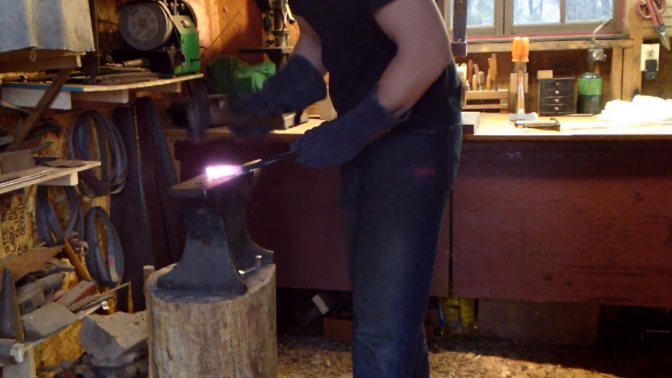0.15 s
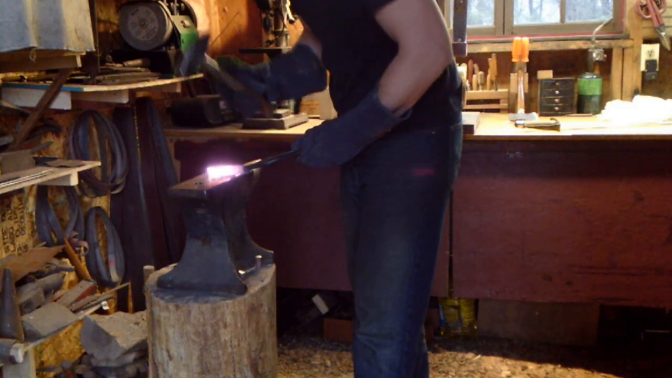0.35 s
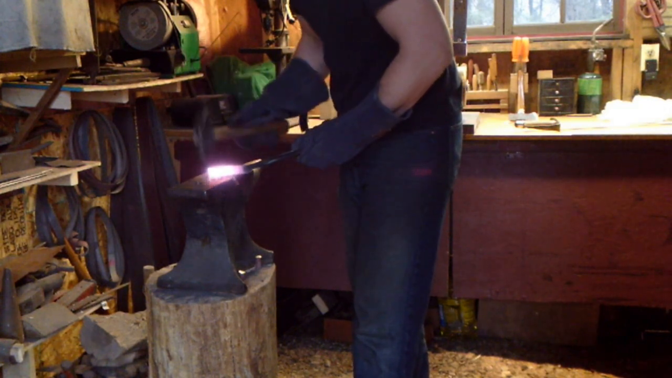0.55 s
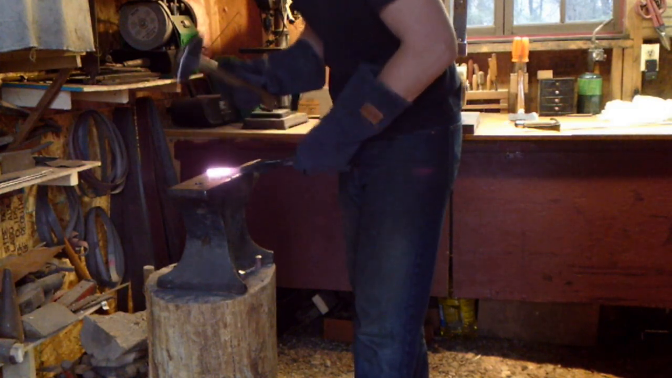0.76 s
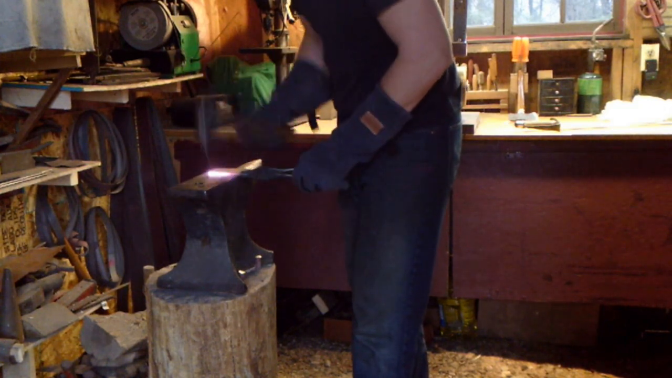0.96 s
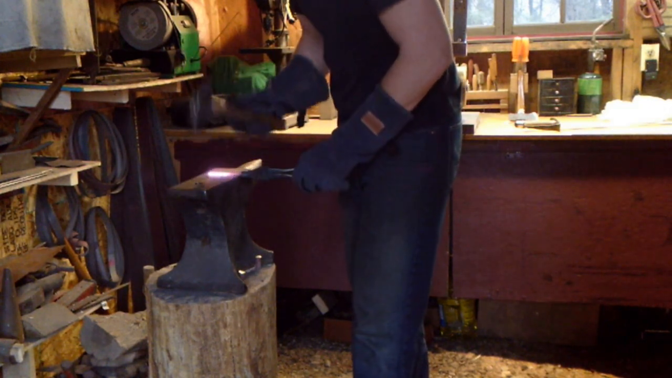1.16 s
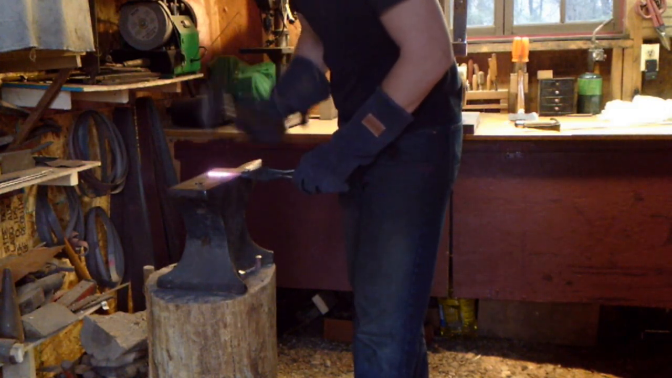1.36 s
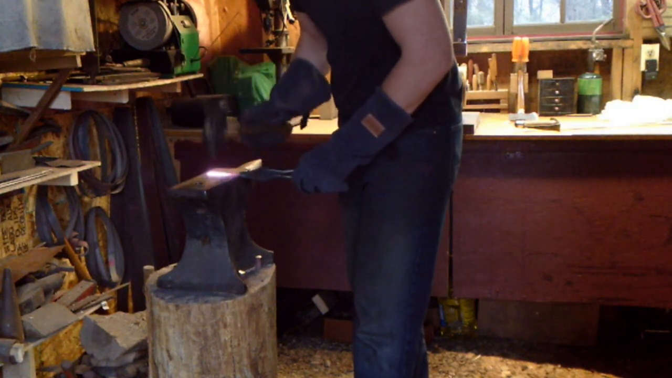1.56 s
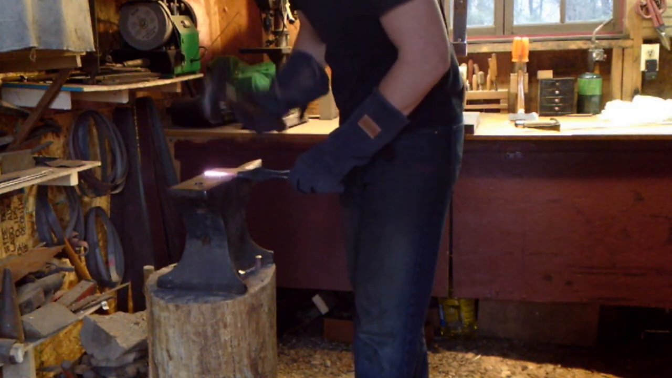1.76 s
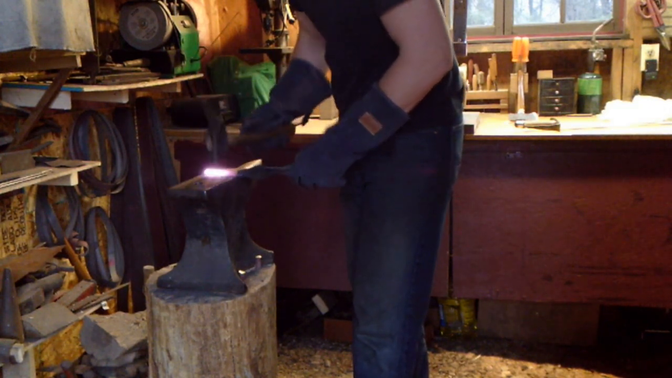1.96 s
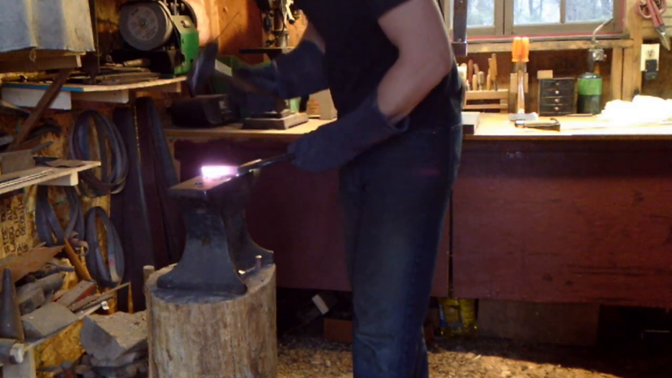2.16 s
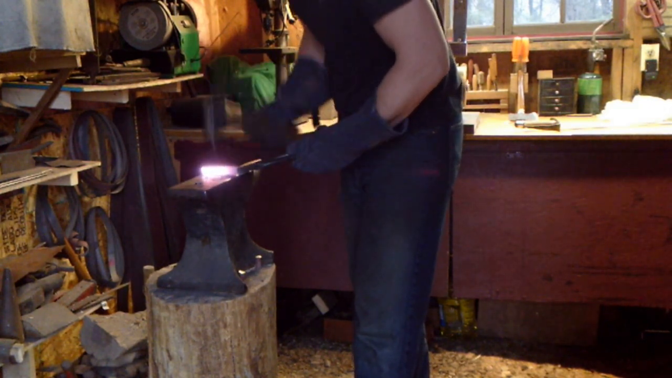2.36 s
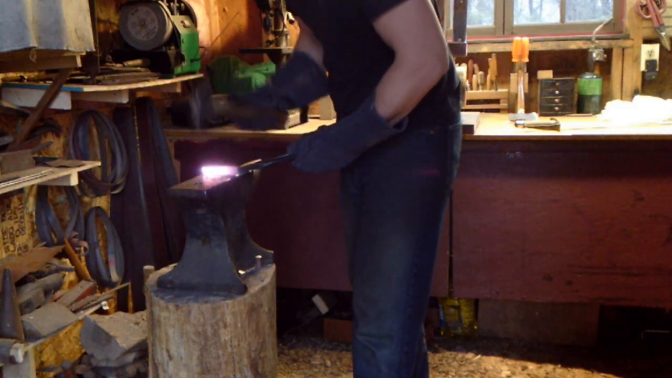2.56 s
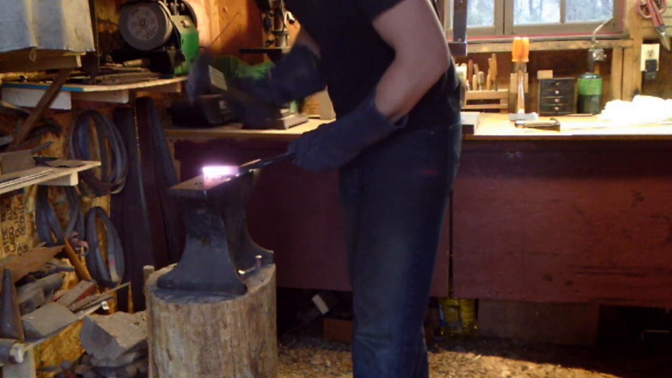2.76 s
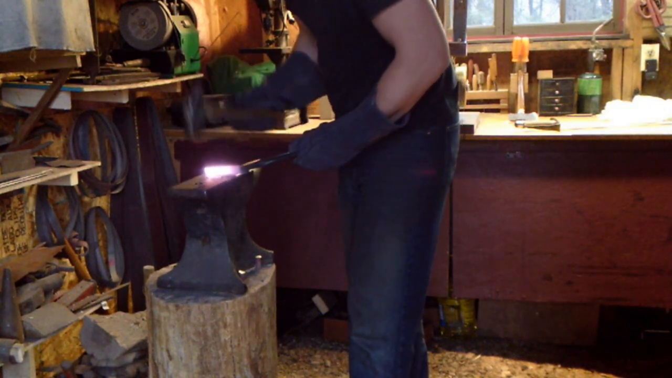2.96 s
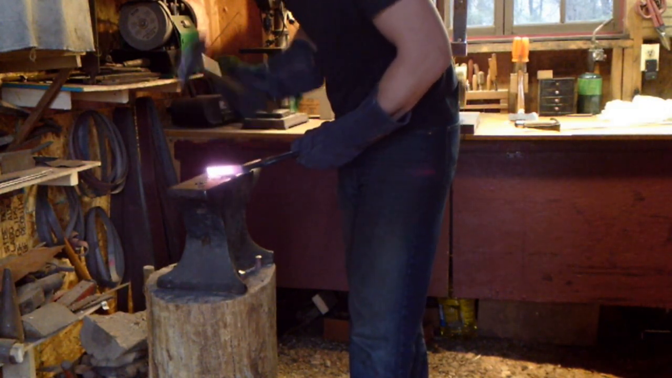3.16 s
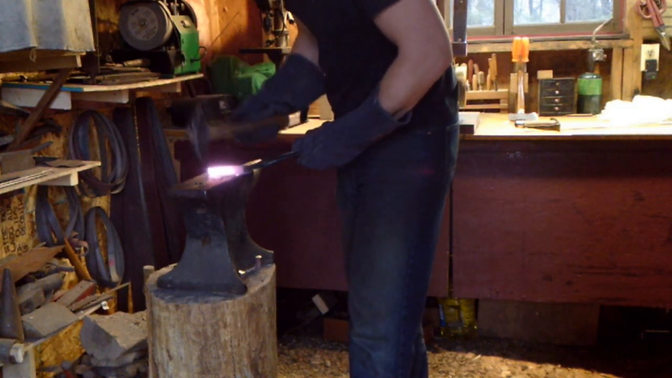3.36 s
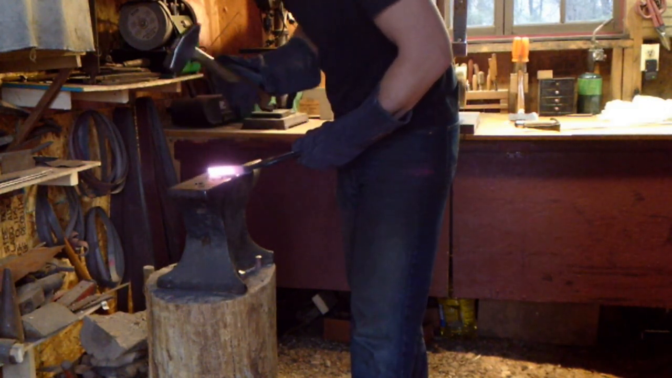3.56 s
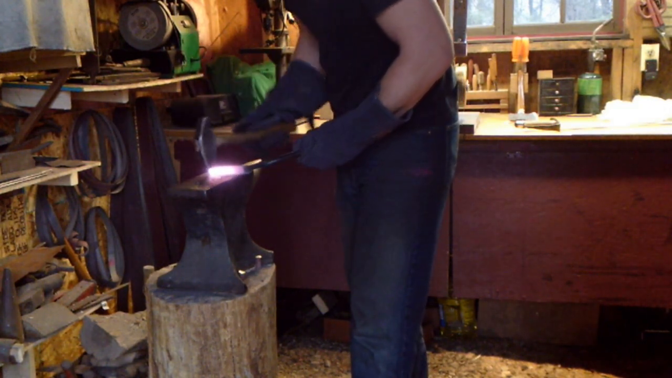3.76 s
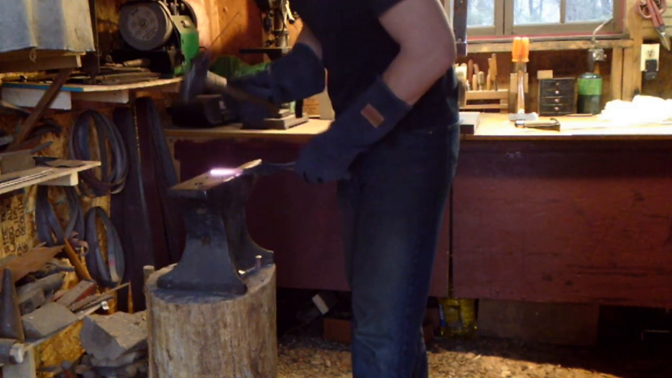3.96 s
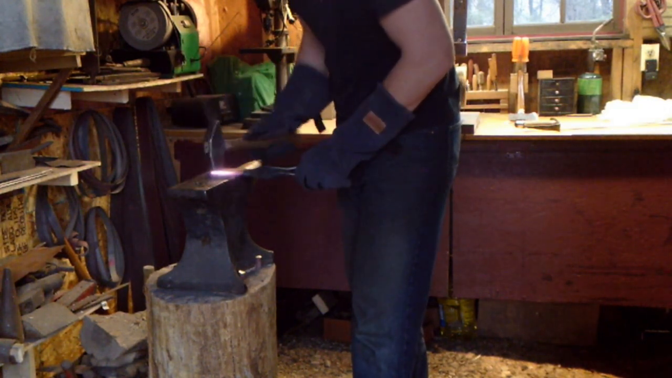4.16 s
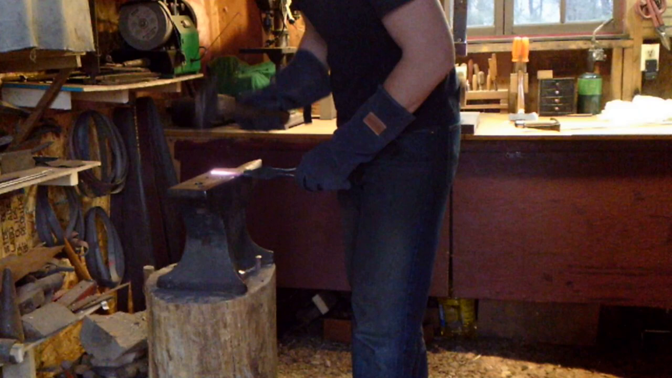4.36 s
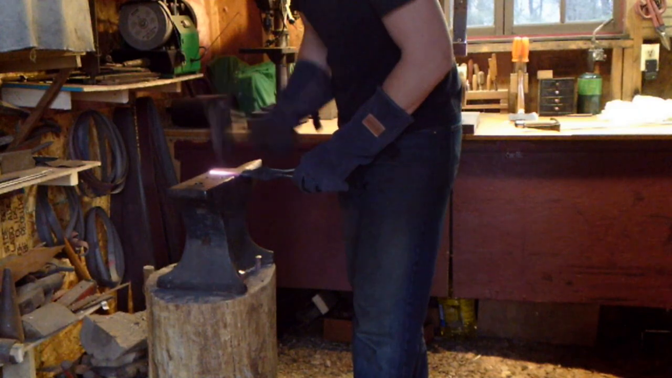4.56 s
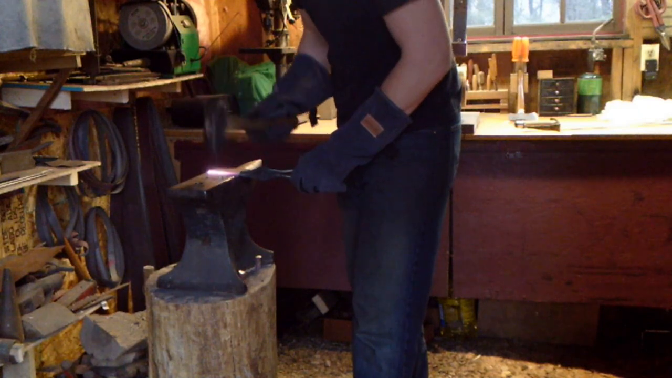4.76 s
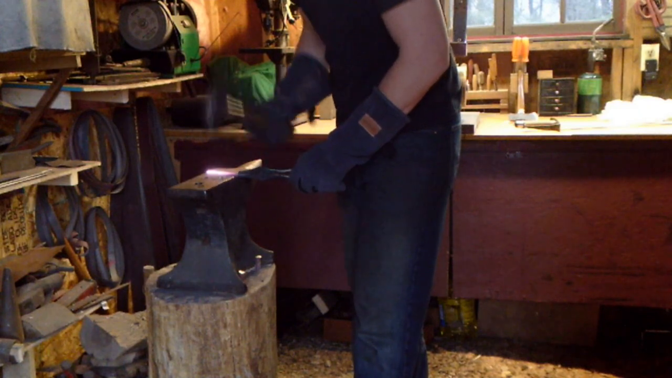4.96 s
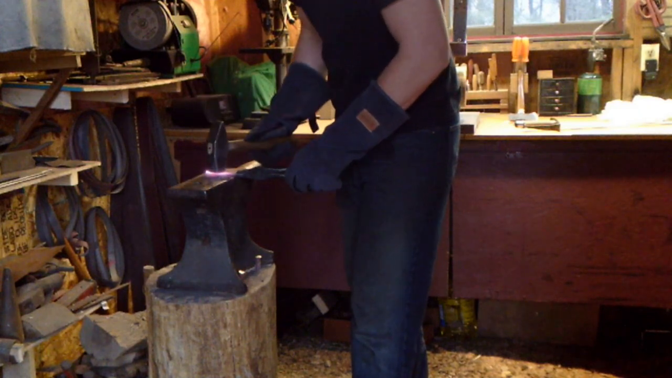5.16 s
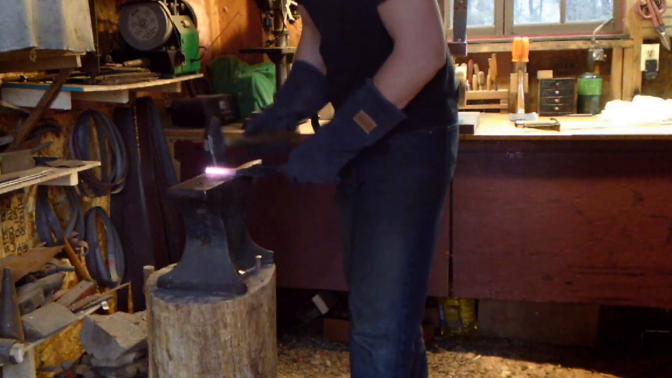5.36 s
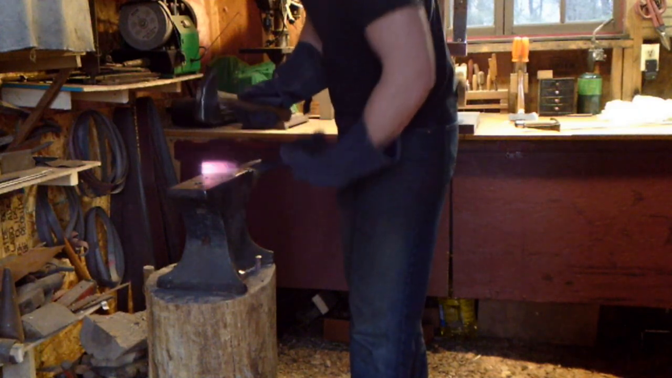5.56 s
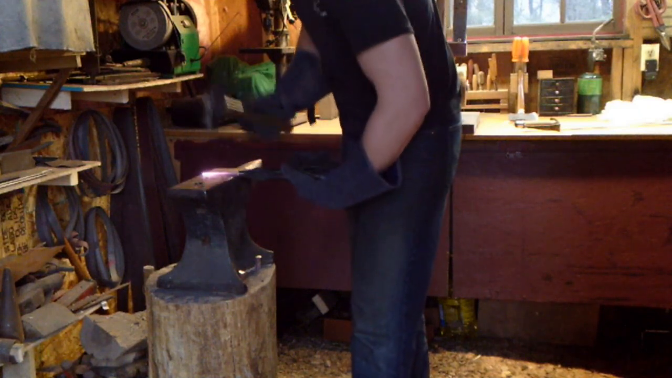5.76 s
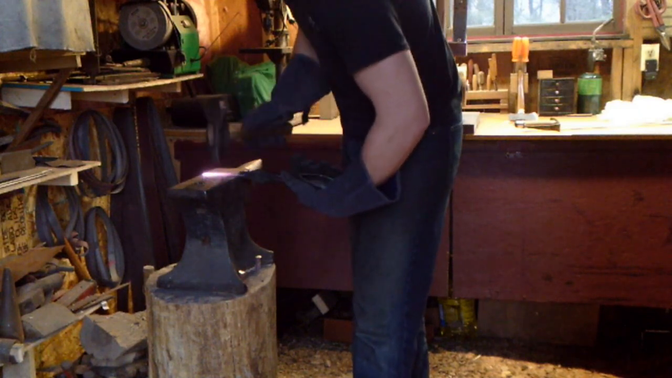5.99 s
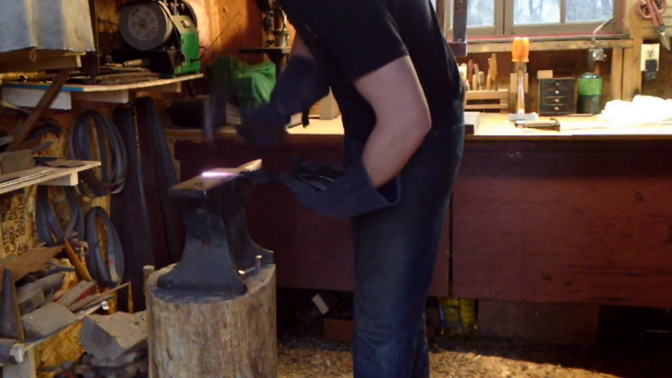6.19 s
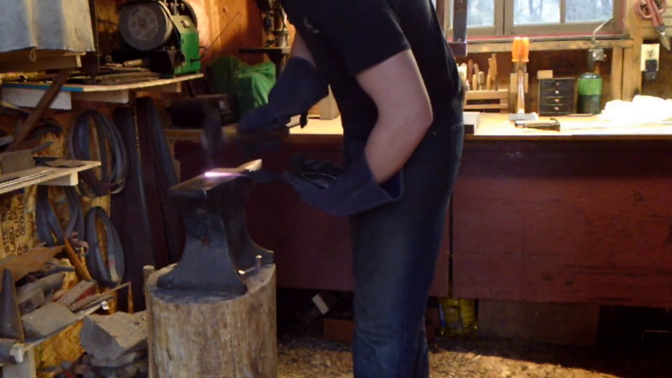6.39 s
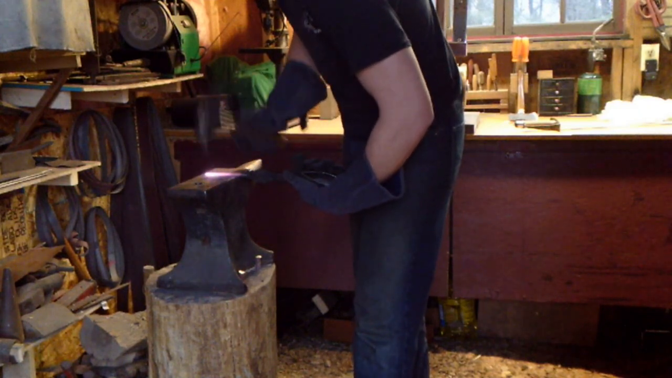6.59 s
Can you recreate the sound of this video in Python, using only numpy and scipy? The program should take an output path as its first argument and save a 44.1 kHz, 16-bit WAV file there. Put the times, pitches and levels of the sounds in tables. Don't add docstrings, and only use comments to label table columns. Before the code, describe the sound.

Close hammering on an anvil in a small workshop, over very faint rumble and hiss. Blows come about every 0.45 seconds: fairly soft, thuddy clanks at 0.05, 0.5 and 1.0, then sharper at 1.45, a hard crack at 1.87, and strong ones at 2.42 and 2.87. Softer blows follow at 3.3, 3.8 and 4.2, then very hard, clipped strikes at 4.64 and 5.07. Each has a dull floor and stump thump, a bright crack and a short anvil ring of a few tenths of a second, smeared by quick room reflections. Between blows the bar ticks and the tongs rattle lightly. Around 5.25 the bar scrapes and rocks, and a louder clatter comes at 5.64 as it is turned, with another rattle at 5.89. Two more hard blows land at 5.9 and 6.3, and the ring fades. The narrow-band microphone distorts on the hardest hits.

```python
import sys
import numpy as np
from scipy import signal
from scipy.io import wavfile

SR = 44100
rng = np.random.default_rng(int(sys.argv[2]) if len(sys.argv) > 2 else 0)


def unload_audio(sound):
    columns = np.transpose(np.atleast_2d(sound))
    steps = np.round(np.clip(columns, -1, 1) * 32767)
    wavfile.write(sys.argv[1], SR, steps.astype(np.int16))


def makeup_ratio(level_db):
    decades = np.asarray(level_db, float) / 20
    return 10 ** decades


N = 292368

# frequency in Hz, level in dB per Hz.
AIR_SPECTRUM = [(12, -10), (25, 2), (76, -12), (145, -18.5), (316, -21), (600, -22.5), (1030, -24.5),
                (1890, -27.5), (2500, -27), (4000, -30), (6500, -28.5)]
# frequency in Hz, t60 in seconds.
ROOM_T60 = [(40, .4), (160, 0.3), (420, 0.21), (1100, 0.16), (2900, 0.155), (6000, .165)]
EDGES_HZ = 22 * 2 ** np.arange(0, 8.6, .5)

# start in seconds, level in dB, pitch in Hz.
TAPS = [(.186, -38.5, 2380), (.204, -37.5, 5360), (0.412, -49, 600), (.807, -43, 610), (0.884, -42.5, 1780),
        (1.283, -39, 970), (1.686, -42.5, 2490), (1.753, -40, 1880), (1.787, -41, 1040), (1.81, -29, 2480),
        (2.007, -32, 943), (2.207, -43, 2330), (2.264, -47, 4840), (2.725, -45, 3290), (3.019, -36, 2160),
        (3.281, -40, 1050), (3.903, -39.5, 2560), (3.954, -41, 2260), (4.002, -42, 1660),
        (4.028, -43.5, 1090), (4.336, -39.5, 2170), (4.524, -45, 2170), (4.557, -42, 1550),
        (4.876, -45, 760), (5.368, -36.5, 2270), (5.41, -42.5, 590), (5.59, -40.5, 2360),
        (5.618, -44, 1600), (5.81, -37.5, 1330), (2.685, -48, 1000)]
# start in seconds, level in dB, pitch in Hz.
RATTLES = [(.002, -48, 4240), (0.302, -49, 1824), (.372, -42.5, 2280), (.785, -44.5, 980),
           (.933, -50, 3080), (0.976, -38, 2010), (1.323, -34, 4210), (2.803, -43.5, 1120),
           (3.092, -43, 920), (3.142, -36.5, 1170), (3.65, -31, 2320), (3.673, -39, 3040),
           (4.443, -47, 1160), (4.492, -42.5, 726), (4.83, -36.5, 820), (4.952, -39, 2160),
           (5.282, -36, 1770), (5.306, -42, 2200), (5.635, -21.5, 760), (5.703, -37.5, 1340),
           (5.71, -37, 4370), (5.783, -43, 4320), (5.891, -28.5, 2560), (6.271, -43, 1134),
           (6.573, -43, 1460)]
# start in seconds, level in dB, pitch in Hz, width in octaves.
SLIDES = [
    (.287, -45, 1060, 0.6),
    (1.255, -42, 1160, 3),
    (2.295, -49.5, 1130, 1.3),
    (5.25, -36.5, 2180, 1.3),
    (5.256, -39.5, 616, 0.7),
    (5.524, -49, 1050, 1.4),
    (5.637, -34.5, 685, 0.5),
    (5.654, -52, 1840, .4),
    (5.66, -40, 1780, 3.7),
]
SETTLES_S = [.186, 3.019, 3.904, 5.25]

# start in seconds, crack level in dB, thud level in dB, first burst in dB over the tail,
# brightness in dB per octave.
BLOWS = [(0.051, -13.5, -12, 11, 2), (0.5045, -14, -12, 6.5, 0.5), (1.0211, -15.5, -13.5, -1.5, 4.5),
         (1.445, -6, -11.5, 12.5, 3.5), (1.8667, 1, -11, 6, 2), (2.4208, -3, -14, 0.5, 0.1),
         (2.866, -4, -12, 6, 1.2), (3.3176, -12, -12.5, 4.5, 4), (3.7705, -8, -11, -1, 0.5),
         (4.219, -11, -13, -1, 8.5), (4.6444, 4.5, -9.5, 12, 3), (5.0738, 5, -12, 13, 2.5),
         (5.8953, 0.8, -16, -2.5, 1.5), (6.296, 1.5, -12, 15.5, 2.5)]
# steps along (-1.5..1.5), steps across (-1.5..1.5),
# gain of the main ring in dB as the bar muffles or frees it.
SPOTS = [(1.3, 1.3, -3.5), (0.27, 1.4, -2.3), (-0.58, -0.42, 2.5), (0.03, 0.046, 1.5), (-0.77, 0.55, 0.1),
         (0.39, -0.33, 0.8), (0.44, -0.12, -1.5), (-0.15, -0.085, 4), (0.32, -1.2, 2.6),
         (-0.84, -0.58, 1.5), (-1.4, -0.23, -1.5), (0.91, -1.1, -2.5), (-0.8, 0.51, -4.5), (-0.2, 0.4, 2)]
# frequency in Hz, level in dB per Hz.
THUD = [(40, -25), (150, -14.5), (300, -13), (500, -6.5), (850, -5.5), (1300, -14.5), (2200, -21.5),
        (6000, -35)]
CRACK = [(40, -54), (500, 6), (1200, 6), (1800, 9.5), (2600, 0), (3800, 4), (4700, -2.5), (5400, -7),
         (6500, 0.5)]
BOOM = [(25, -11.5), (65, -8), (140, -7.5), (240, -16.5), (500, -41.5), (6000, -61.5)]
# frequency in Hz, level in dB, t60 in seconds.
FLOOR = [(138, -4.5, 0.073), (68, -10.5, .12)]
# frequency in Hz, level in dB, t60 in seconds.
REBOUND = [(67, -17, .2), (100, -26, .12)]
# frequency in Hz, level in dB, t60 in seconds.
STUMP = [(366, -15, .33), (474, -7, .16), (657, -4, .12), (785, -6, .11), (841, -2, .13), (1083, -6, .12),
         (1203, -6, .12), (1292, -6, .12), (1490, -8, .1), (1543, -8, .1)]
# frequency in Hz, level in dB, t60 in seconds.
ANVIL = [
    [(1810, 0, .23), (1810, -23, .5), (1782, -11, .14), (1730, -3, .06)],
    [(2961, 0, .205), (3160, -18, .2)],
    [(3845, -3, .11), (3812, -3, .11), (3750, -9, .1)],
    [(4680, 0, .28)],
    [(4590, 0, .17), (4320, -9, .17), (5255, -5, .1)],
]
# level in dB over the crack, dB per step along,
# dB per step across, dB per burst dB.
VOICE_LAW = [(-7.5, -0.26, 0.75, 0.2054), (-12, 4, 0.75, 0.0654), (-8, -2.5, -0.1, 0.37),
             (-26.5, -0.6, 6.5, 0.16), (-32, 1.2, 0.6, 1.45)]

BUILD_UP_S = .0007


def at_hz(points, hz):
    points = np.array(points)
    return np.interp(np.log(hz), np.log(points[:, 0]), points[:, 1])


def convolve(x, response):
    return signal.fftconvolve(x, response)[:N]


def clicks(times, levels_db):
    out = np.full(N, 1e-18)
    out[np.round(np.asarray(times) * SR).astype(int)] = makeup_ratio(np.asarray(levels_db))
    return out


def ring(x, hz, t60):
    radius = makeup_ratio(-60 / (t60 * SR))
    angle = 2 * np.pi * hz / SR
    return signal.lfilter([0, np.sin(angle)], [1, -2 * radius * np.cos(angle), radius * radius], x)


def bands(size):
    white = rng.standard_normal((2, size + 8000))
    for k, (low, high) in enumerate(zip(EDGES_HZ, EDGES_HZ[1:])):
        sos = signal.butter(2, [low, high], "band", fs=SR, output="sos")
        yield np.sqrt(low * high), signal.sosfilt(sos, white[k % 2])[8000:]


def drift(rate_hz):
    r = np.exp(-80 * np.pi * rate_hz / SR)
    slow = signal.lfilter([1], [1, -2 * r, r * r], rng.standard_normal(N // 40 + 2002))[2000:]
    return np.interp(np.arange(N) / 40, np.arange(len(slow)), slow / slow.std())


def air(level_db, patchy_db, rumble_db):
    together = drift(6.0)
    out = 0
    for hz, noise in bands(N):
        flicker_db = patchy_db * (together + drift(25)) + rumble_db * drift(13.0) * (hz < 120)
        out = out + makeup_ratio(at_hz(AIR_SPECTRUM, hz) + flicker_db) * noise
    return makeup_ratio(level_db) * out / out.std()


def workshop(x, direct_db, wet_db, t60):
    t = np.arange(SR // 2) / SR
    tail = rng.standard_normal(len(t)) * (1 - np.exp(-t / BUILD_UP_S)) * makeup_ratio(-60 * t / t60)
    return makeup_ratio(direct_db) * x + makeup_ratio(wet_db) * convolve(x, tail / np.sqrt(np.sum(tail ** 2)))


def touches():
    half = 2 ** 0.25
    taps = [(s, db, hz, hz / half, hz * half, 0.027) for s, db, hz in TAPS]
    rattles = [(s, db, hz, min(1000, .85 * hz), 4400, 0.031) for s, db, hz in RATTLES]
    slides = [(s, db, hz, hz / 2 ** (width / 2), hz * 2 ** (width / 2), 0.1) for s, db, hz, width in SLIDES]
    return taps + rattles + slides


def tongs_and_bar():
    out, t = np.zeros(N + SR), np.arange(SR // 5) / SR
    for s, db, pitch_hz, low_hz, high_hz, t60 in touches():
        sos = signal.butter(1, [low_hz, high_hz], "band", fs=SR, output="sos")
        puff = signal.sosfilt(sos, rng.standard_normal(len(t)))
        note = makeup_ratio(2.5 - 60 * t / .08) * np.sin(2 * np.pi * pitch_hz * t)
        fade = (1 - np.exp(-t / 0.0008)) * makeup_ratio(-60 * t / np.clip(t60, .008, .15))
        out[round(s * SR):][:len(t)] += makeup_ratio(db + 1.0) * fade * (puff / puff.std() + note)
    contacts = out[:N]
    hum = sum(ring(contacts, hz, t60) for (hz, db, t60), *others in ANVIL)
    return workshop(contacts + makeup_ratio(-54) * hum, direct_db=-1.5, wet_db=-7, t60=.1)


def echoes():
    burst_t60_s, grain_db, late_cycles = .045, 2.5, .5
    out, t = np.zeros(N + SR), np.arange(SR // 3) / SR
    for hz, noise in bands(N + SR):
        noise[:N] *= makeup_ratio(grain_db * drift(min(hz / 8, 120)))
        for s, crack_db, thud_db, burst_db, tilt_db in BLOWS:
            crack = crack_db - 2.0 + at_hz(CRACK, hz) + tilt_db * np.log2(hz / 2500)
            thud = thud_db + 19.5 + at_hz(THUD, hz)
            boom = thud_db + 9.5 + at_hz(BOOM, hz)
            level = np.linalg.norm(makeup_ratio([crack, thud, boom]))
            soft_s = .00025 * max(-6 - crack_db, 0)
            swell = 1 - np.exp(-t / (BUILD_UP_S + soft_s + late_cycles / hz))
            t60 = (.86 + .002 * burst_db) * at_hz(ROOM_T60, hz)
            fade = makeup_ratio(-60 * t / t60) * (1 + makeup_ratio(burst_db - 60 * t / burst_t60_s))
            start = round((s - .0012) * SR)
            out[start:start + len(t)] += level * swell * fade * noise[start:start + len(t)]
    return out[:N]


def struck(times, levels_db, modes, spread_db, swell_t60):
    luck, out = rng.standard_normal((len(times), len(modes))), 0
    for k, (hz, db, t60) in enumerate(modes):
        uneven_db = spread_db * luck[:, k] * (db < 0)
        hits = clicks(times, levels_db + db + uneven_db)
        out = out + ring(hits, hz, t60) - ring(hits, hz, swell_t60)
    return out


def floor(times, thud_db):
    at_blow = struck(times, thud_db, FLOOR, spread_db=2.5, swell_t60=0.02)
    heave = struck(times + .07, thud_db, REBOUND, spread_db=-2.0, swell_t60=0.045)
    return at_blow + heave


def stump(times, thud_db):
    return struck(times, thud_db - 4.5, STUMP, spread_db=3.0, swell_t60=0.019)


def settling():
    choke_db, settle_s = 9.5, 0.017
    t, db, blows = np.arange(N) / SR, np.zeros(N), np.array(BLOWS)[:, 0]
    for s in SETTLES_S:
        until = blows[blows > s][0] - .01
        db -= choke_db * np.clip((t - s) / settle_s, 0, 1) * (t < until)
    return makeup_ratio(db)


def anvil(times, crack_db, burst_db):
    along, across, muffle_db = np.transpose(SPOTS)
    out = 0
    for k, (db, per_along, per_across, per_burst) in enumerate(VOICE_LAW):
        voice_db = crack_db + db + per_along * along + per_across * across + per_burst * burst_db
        if k == 0:
            voice_db = voice_db + muffle_db
        out = out + makeup_ratio(1.5 * drift(30)) * struck(times, voice_db, ANVIL[k], spread_db=2, swell_t60=.014)
    return settling() * out


def hammer():
    s, crack_db, thud_db, burst_db, _ = np.transpose(BLOWS)
    s = s - .001
    return floor(s, thud_db) + stump(s, thud_db) + echoes() + anvil(s, crack_db, burst_db)


def scene():
    return (air(level_db=-47, patchy_db=0.03, rumble_db=3.5) + tongs_and_bar() + hammer())[None]


def roll_off(x):
    return signal.sosfilt(signal.butter(12, 16870, fs=SR, output="sos"), x)


def record(dry):
    preamp_limit, offset, final_limit = 0.79, 0.0078, .725
    flat = np.clip(dry, -preamp_limit, preamp_limit)
    dull = signal.sosfilt(signal.butter(2, 5650, fs=SR, output="sos"), flat)
    taps = signal.firwin(151, 5480, window=("kaiser", 10), fs=SR)
    narrow = signal.fftconvolve(dull, taps[None], "same")
    clipped = np.clip(narrow + offset, -final_limit, final_limit)
    smooth = signal.sosfilt(signal.cheby2(12, 60, 16900, fs=SR, output="sos"), clipped)
    return roll_off(smooth)


dry = scene()
out = record(dry)
unload_audio(out)
```